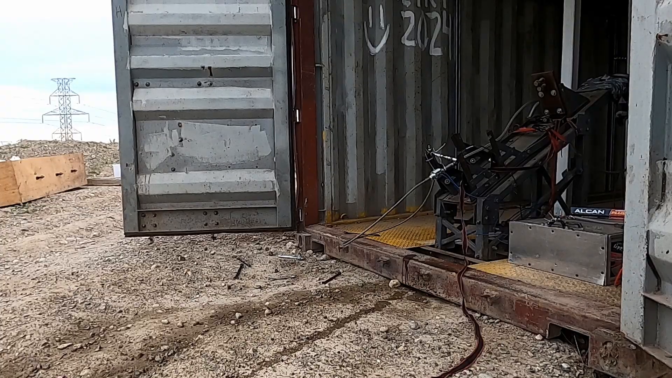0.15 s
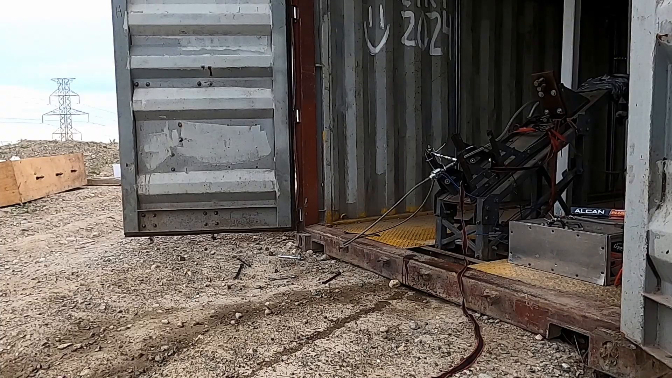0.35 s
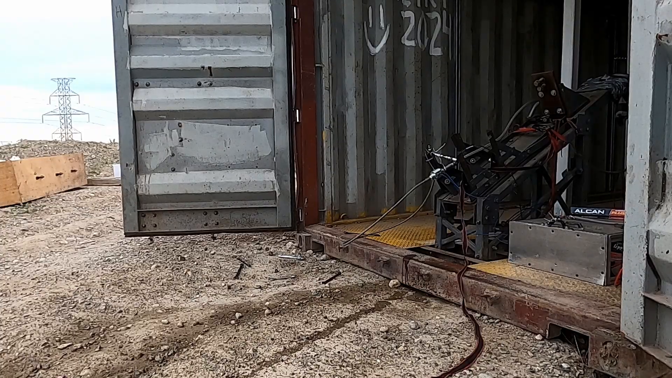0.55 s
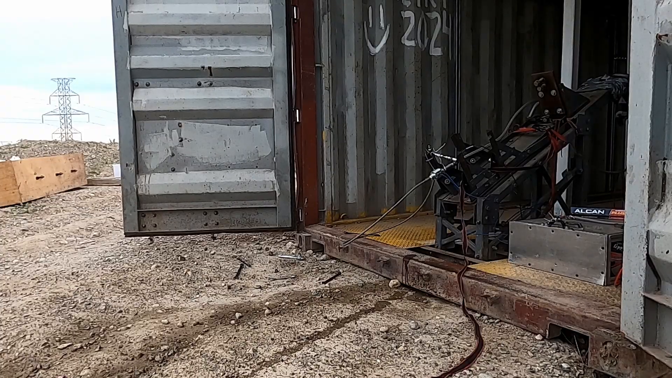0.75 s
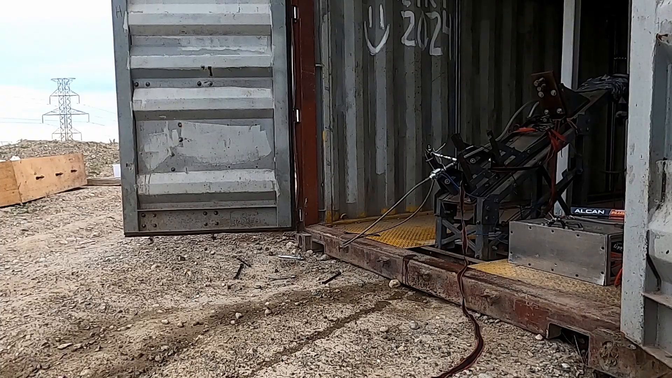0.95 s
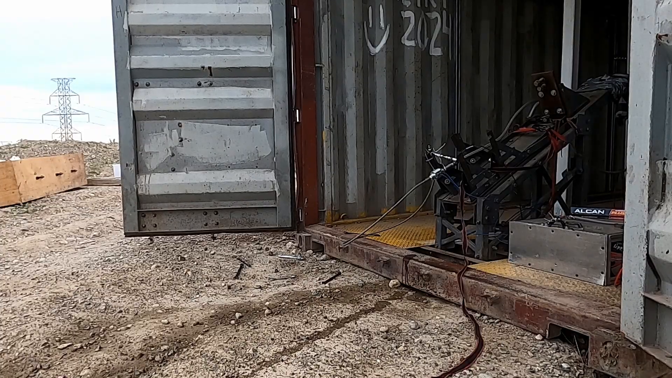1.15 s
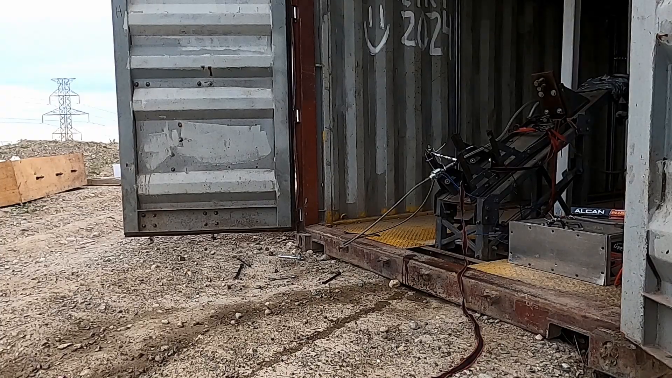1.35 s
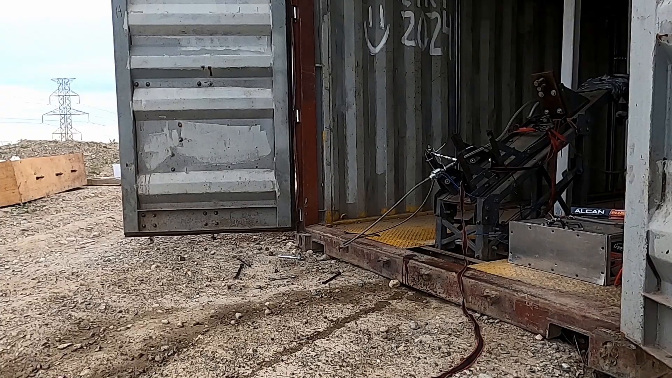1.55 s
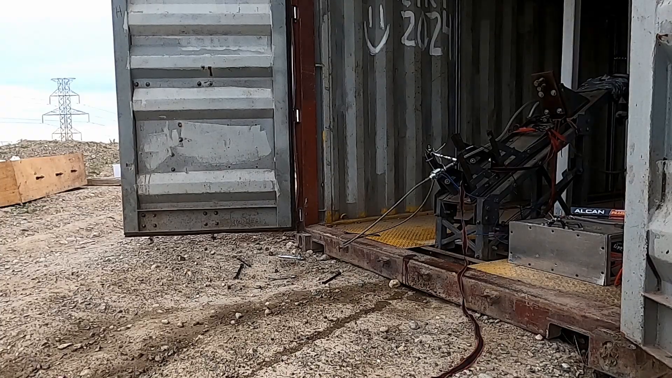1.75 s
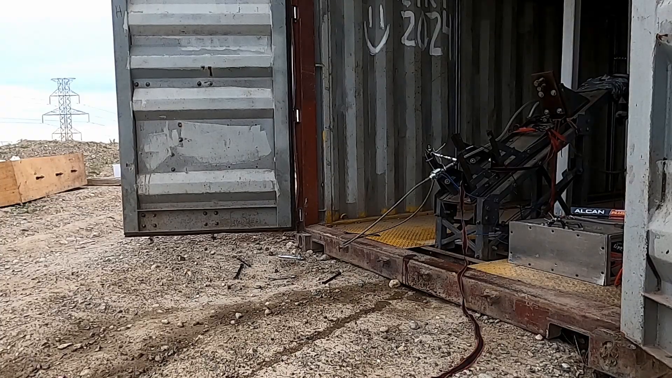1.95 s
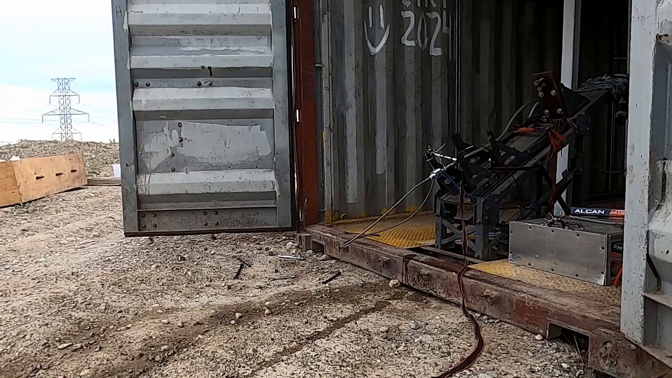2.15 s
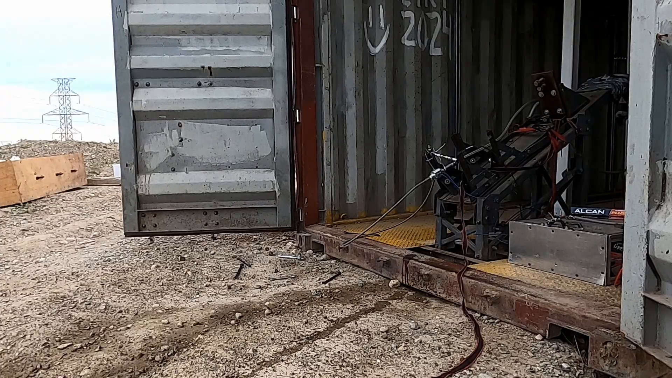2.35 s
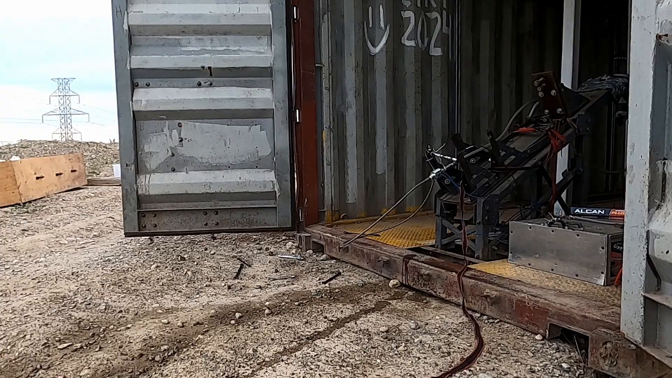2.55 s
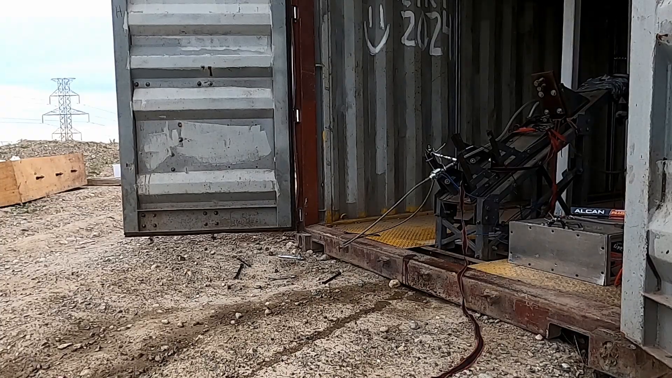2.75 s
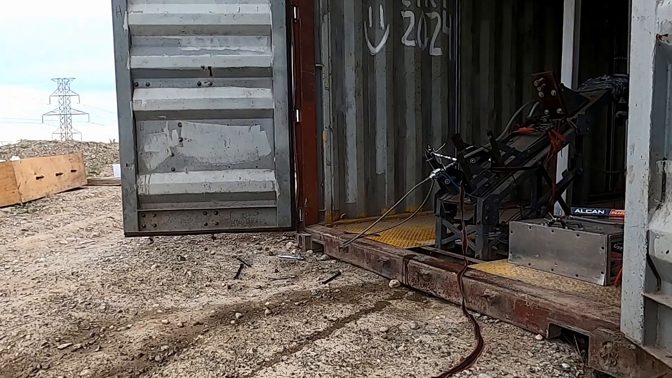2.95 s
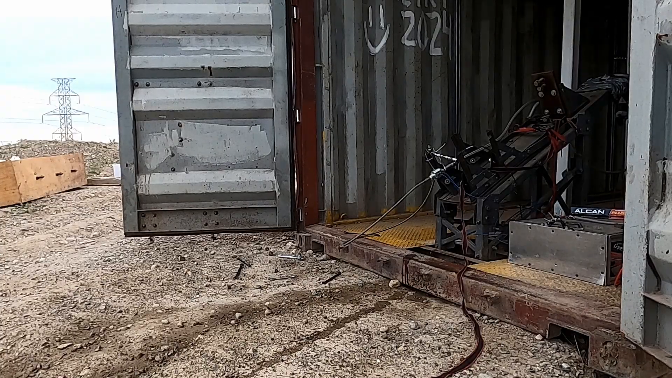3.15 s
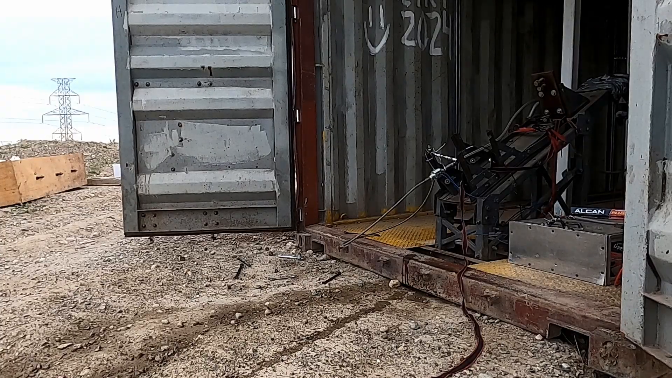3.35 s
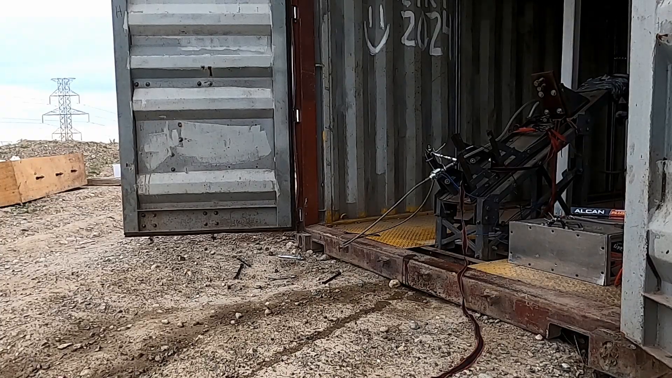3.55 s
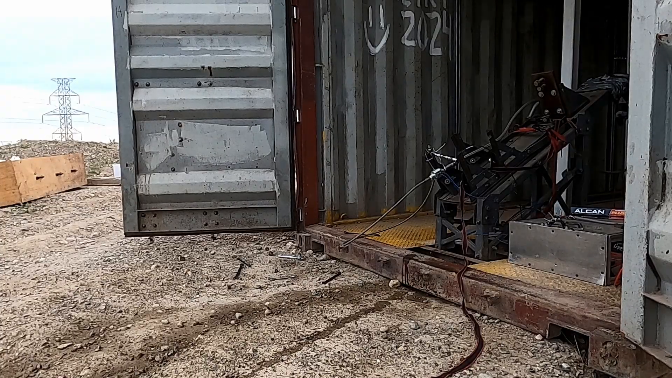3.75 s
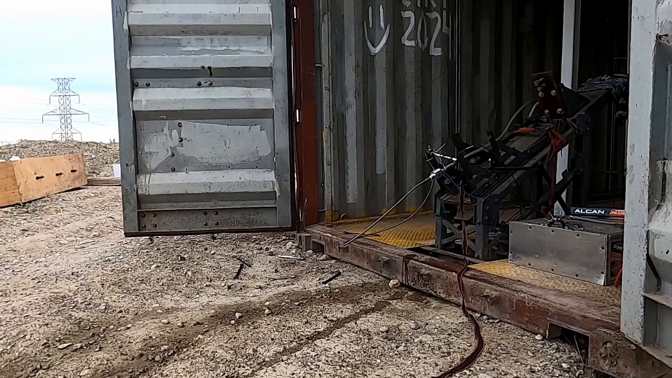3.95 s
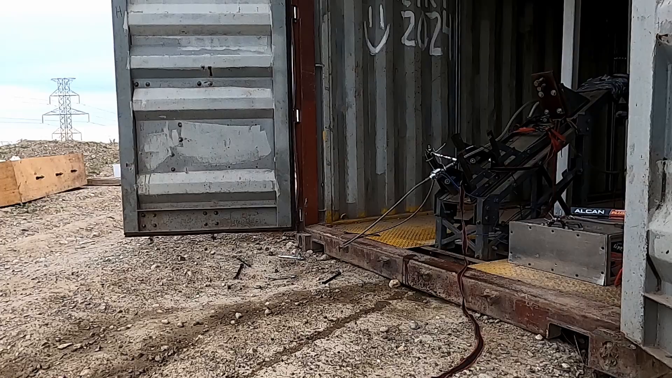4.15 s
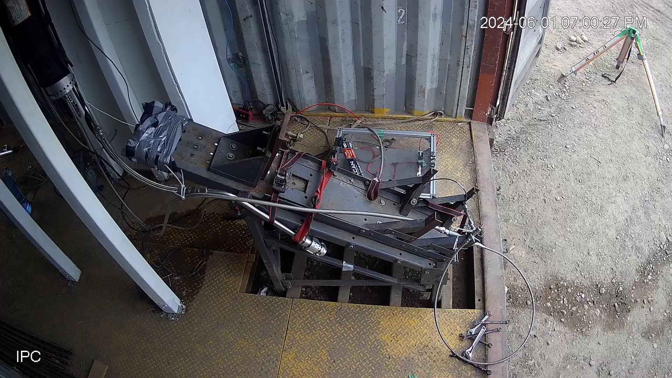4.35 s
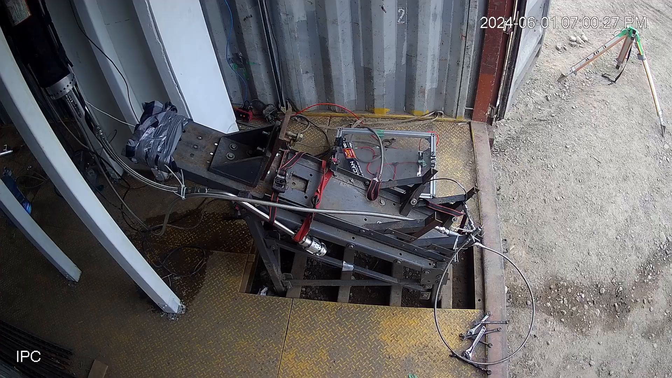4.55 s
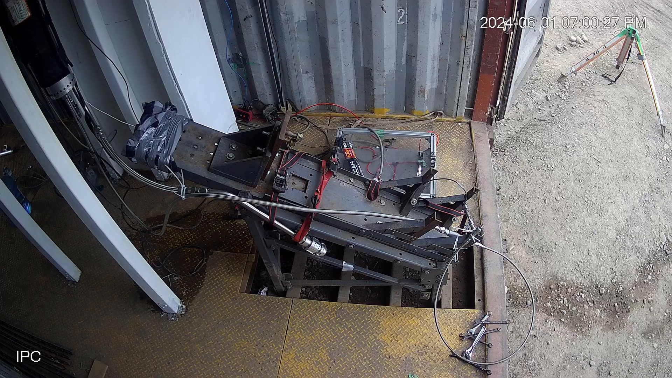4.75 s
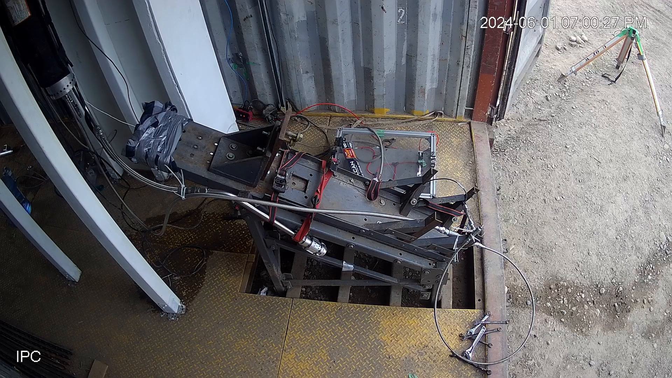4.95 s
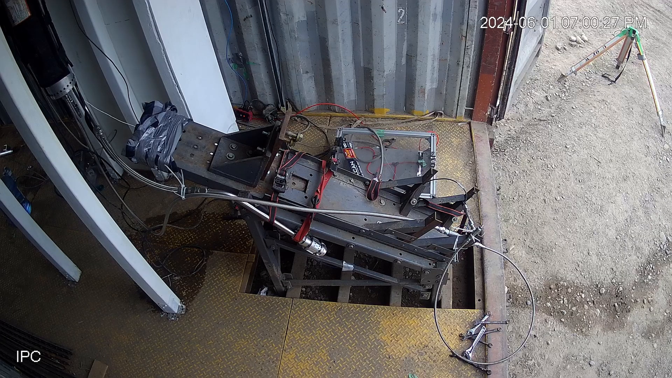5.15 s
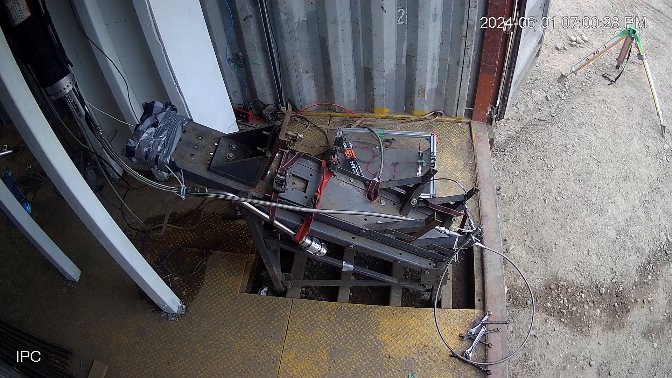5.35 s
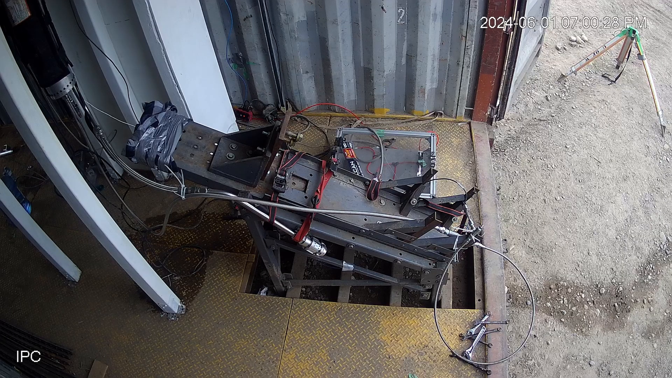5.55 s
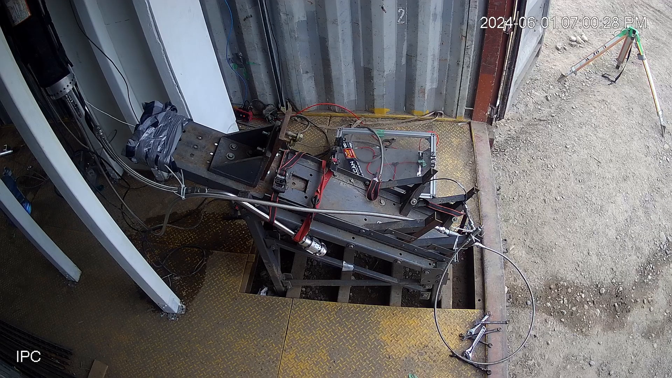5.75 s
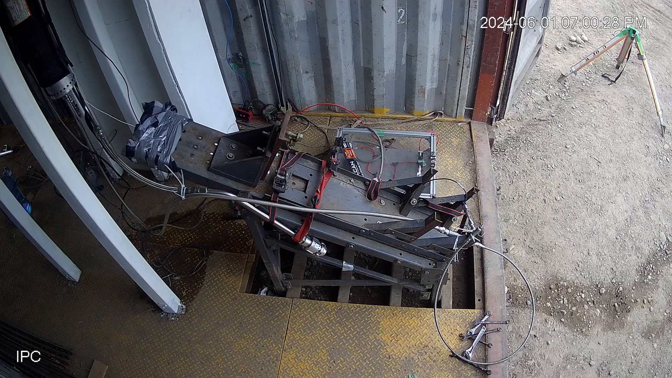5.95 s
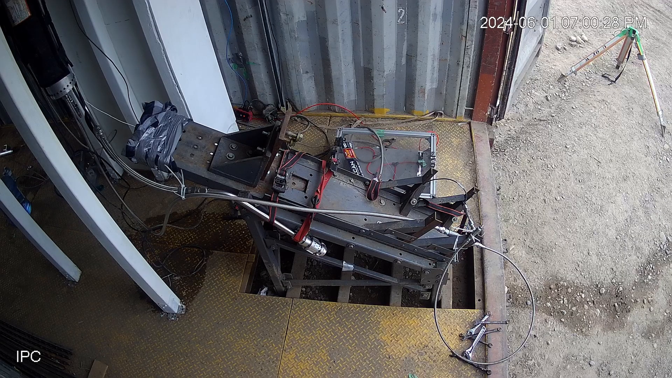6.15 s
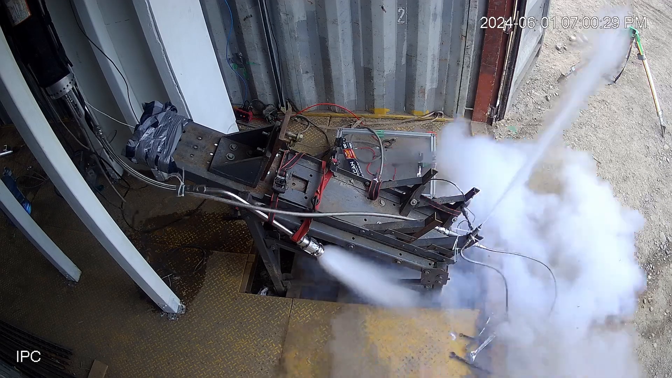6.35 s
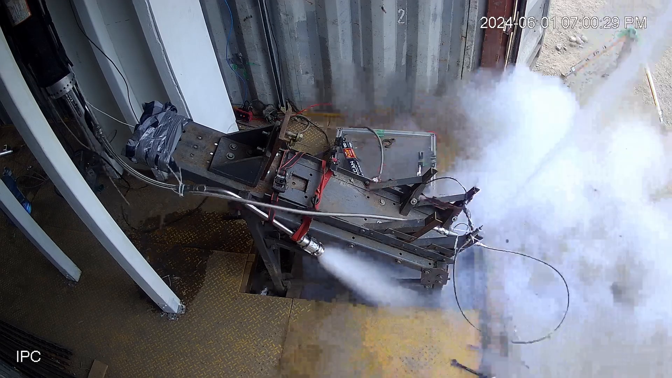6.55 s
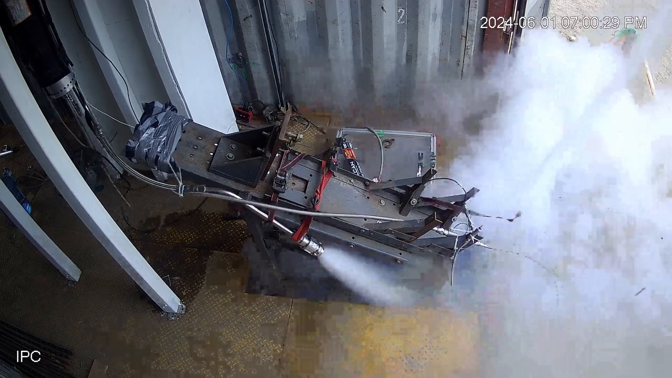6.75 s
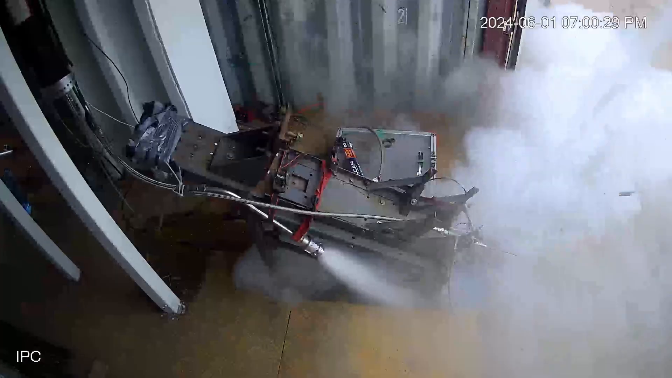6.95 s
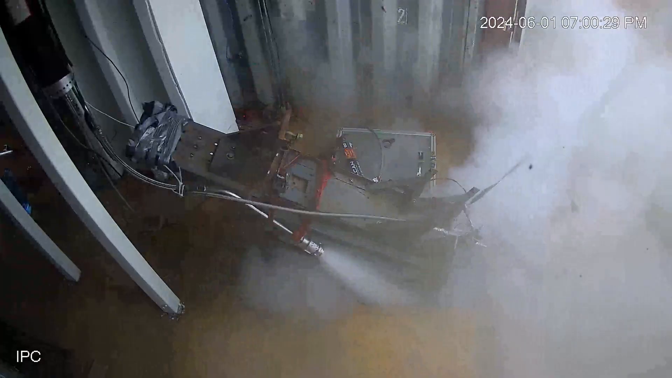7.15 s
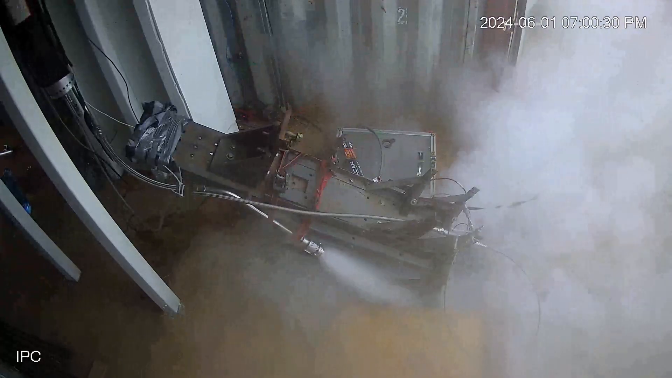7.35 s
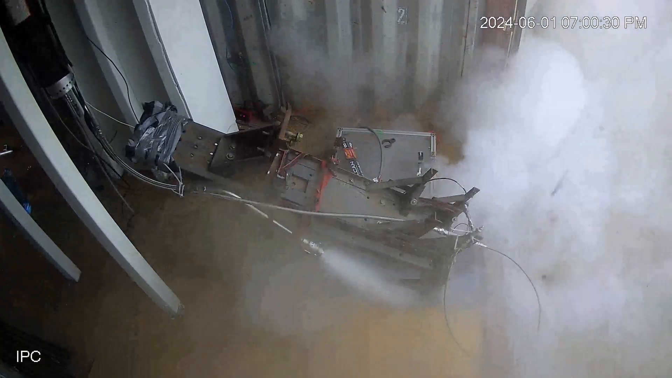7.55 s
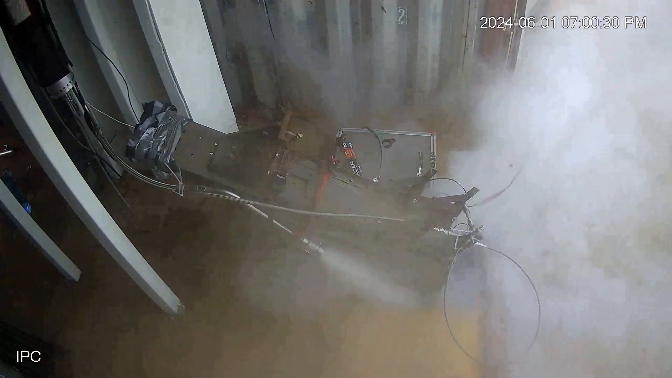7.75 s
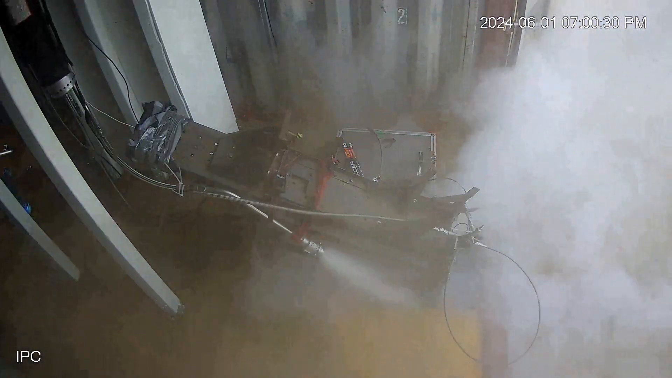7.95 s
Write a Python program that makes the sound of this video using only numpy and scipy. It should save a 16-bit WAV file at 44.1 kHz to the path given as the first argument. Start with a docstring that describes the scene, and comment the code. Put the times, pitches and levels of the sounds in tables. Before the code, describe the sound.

A gas vent hisses continuously, bright and wide in stereo, above soft rumble and hum outside an open container. After a tiny dip at an abrupt cut, the perspective is close and central inside the steel box, duller and lower in level, with a faint high tone. Suddenly the main valve bangs, pipe and walls ring briefly, and a heavy gusting jet roar takes over, its hiss slowly sinking.

```python
"""A steel container with an engine test stand inside, on gravel. A stereo pair out on the gravel hears
a pressure vent hiss over rumble and hum; a hard cut leads to one microphone inside, with a faint whine.
There the main valve slams open: decaying tones ring box and pipe, and the propellant jet roars.
Vent and jet are coloured, gusting noise with resonances; hum and whine are wavering sines."""
import sys
import numpy as np
from scipy import signal
from scipy.fft import rfft, irfft, next_fast_len
from scipy.io import wavfile

SR = 44100
rng = np.random.default_rng(int(sys.argv[2]) if len(sys.argv) > 2 else 0)


def persist_wave(psi):
    """Save psi, clipped to +-1, as 16-bit WAV."""
    counts = np.round(np.clip(psi, -1, 1) * 32767).astype(np.int16)
    wavfile.write(sys.argv[1], SR, np.atleast_2d(counts).T)


N = 353682
SIZE = next_fast_len(N)
GRID_HZ = np.arange(SIZE // 2 + 1) * SR / SIZE + 1e-3  # kept above zero for logs and ratios

# On the gravel. Relative spectrum of the vent's hiss: frequency_hz [Hz], density_db [dB per Hz]
GRAVEL_HISS = [(500, -49), (1200, -20.5), (2000, -11.5), (2900, -7), (3800, -3), (4700, -4.5), (5700, -5.5),
               (6500, -7.5), (7200, -9), (8500, -11.5), (10000, -14), (12500, -17.5), (14000, -23),
               (17000, -29)]
# Relative spectrum of the rumble below it: frequency_hz [Hz], density_db [dB per Hz]
GRAVEL_RUMBLE = [(15, -30), (30, -9), (75, -3), (210, -5), (400, -1), (550, -4.5), (900, -9), (1400, -11.5),
                 (2200, -15.5), (4000, -31)]
# Resonances and notches of box and ground: centre_hz [Hz], width_hz [Hz], bell_db [dB]
GRAVEL_RINGS = [(204, 79, 7.5), (333, 47, -1.7), (398, 43, 2.8), (484, 204, -3.8), (592, 21, -1.7),
                (732, 37, 3.0), (785, 107, -3.0), (1012, 45, 3.2), (1098, 55, -2.4), (1173, 18, -1.9),
                (1205, 34, 3.2), (1302, 57, 2.1), (1744, 90, -2.7), (2088, 61, -2.1), (2820, 143, -2.4),
                (3046, 74, 1.9), (3369, 56, 3.0), (3542, 80, 2.5), (3800, 105, 3.5), (3951, 50, 2.3),
                (4166, 83, 1.8), (4317, 49, 1.6), (4661, 131, -2.3), (4909, 82, 2.3), (5889, 92, 4.1),
                (6826, 158, 2.2), (6976, 66, 2.1), (7719, 139, 2.0), (10788, 84, 3.3), (12403, 83, 2.4)]
# Likeness of the stereo pair's two ports: frequency_hz [Hz], likeness [0-1]
PAIR_LIKENESS = [(60, .94), (290, .97), (1400, .9), (3100, .85), (6800, .72), (9000, .62), (15000, .4)]
# Shadow on the left port: frequency_hz [Hz], left_minus_right_db [dB]
LEFT_SHADOW = [(200, 0), (1300, -2.5), (2400, 0.5), (6000, 0), (8100, -2), (11000, -6.5), (15000, -9)]
# Phase of left against right, differing by frequency, which spreads the hiss across the stereo:
# frequency_hz [Hz], phase_rad [radians]
LEFT_PHASE = [(0, 0), (5860, -1.32), (7410, -3), (8610, -1), (9130, -2.5), (11500, -1.6), (12800, -3),
              (14000, -1), (16200, -4)]
# Hum under the hiss: pitch_hz [Hz], level_db [dB], level_waver_db [dB spread], pitch_waver_hz [Hz spread]
GRAVEL_HUM = [(202.8, -45, 1.5, 1.97), (224.5, -48, 0.5, 2.97), (405, -56, -3, 3.97), (726, -58, -1, 3.95),
              (1015, -56.5, 7.5, 4.03)]

# Inside the container. Relative spectrum of the vent: frequency_hz [Hz], density_db [dB per Hz]
BOX_HISS = [(15, -30), (45, -2.5), (115, -9.5), (250, -7.5), (500, -10), (1200, -12.5), (2200, -12.5),
            (3500, -7.5), (5200, -6), (7700, -10), (9000, -7.5), (10300, -12.5), (12500, -18), (15400, -33)]
# Resonances and notches heard in the box: centre_hz [Hz], width_hz [Hz], bell_db [dB]
BOX_RINGS = [(204, 49, 6.9), (333, 26, 6.2), (376, 63, -4.4), (452, 42, 2.3), (506, 16, -3.7),
             (570, 62, -4.3), (656, 37, 6.7), (796, 32, -3.5), (1076, 59, -3.6), (1141, 31, 4.5),
             (1173, 105, -2.9), (1324, 26, 2.7), (1647, 96, 3.8), (2207, 174, -4.9), (3100, 791, 2.7),
             (4026, 75, 2.5), (4220, 178, -6.7), (4694, 59, 3.3), (4963, 180, 3.9), (5211, 81, 2.7),
             (7278, 278, 2.8), (8527, 302, 3.2), (9216, 63, 3.0), (9366, 64, 2.9), (9571, 379, 3.2),
             (10454, 140, 3.0), (10809, 139, 6.4), (11380, 525, -5.0), (12446, 284, 3.7), (13189, 103, 3.4)]
# Hum in the box: pitch_hz [Hz], level_db [dB], level_waver_db [dB spread], pitch_waver_hz [Hz spread]
BOX_HUM = [(205, -53.5, 1.5, 2), (331, -53.5, 1.5, 2), (659.5, -55, 1.2, 2.5)]
# Path of the faint whine: time_s [s], pitch_hz [Hz]
WHINE_PATH = [(4.37, 1125), (4.8, 1155), (5.05, 1125), (5.3, 1095), (5.48, 1138), (5.8, 1128), (6.24, 1142)]
# Relative spectrum of the jet: frequency_hz [Hz], density_db [dB per Hz]
JET_SPECTRUM = [(12, -56), (20, -30.5), (155, -2), (270, -8), (328, -7), (525, -11), (587, -13.5),
                (1140, -18), (1550, -15), (2100, -23), (3010, -15), (4310, -19), (9110, -27.5),
                (11100, -40.5), (15000, -53)]
# Resonances and notches of the jet in the box: centre_hz [Hz], width_hz [Hz], bell_db [dB]
JET_RESONANCES = [(95, 14, 3), (166, 28, 3.5), (219.6, 14.5, 8), (320.4, 38, 6.5), (595, 25, 6),
                  (702, 37, 1.5), (803, 27, 0), (1100, 35, 0), (1270, 38, 5), (1530, 400, -0.5),
                  (2130, 560, -1), (3030, 1100, 1), (4270, 590, -7.5), (5130, 680, 1), (9400, 610, 5),
                  (12435, 350, 2)]
# Jet parts, in order roar, rush, hiss: level_db [dB], valve_lag_s [s], rise_db_per_s [dB/s],
# surge_db [dB], surge_settle_s [s], gust_db [dB spread], gust_rate_hz [Hz]
JET_LAYERS = [(-15.5, 0.0042, 2600, 3, 0.49, 1.04, 2.6), (-21, 0.0047, 1300, 3.5, 0.091, 0.5, 2.2),
              (-21.5, 0.0005, 1500, 5, 0.019, 1.15, 7.8)]
# Modes of box and pipe rung by the pressure step:
# start_s [s], pitch_hz [Hz], level_db [dB, before swell and decay], t60_s [s to fall 60 dB]
SLAM_MODES = [(6.247, 46, -7, 0.16), (6.2502, 3350, -6, 0.037), (6.2497, 2950, -11, 0.025),
              (6.251, 3750, -11, 0.025)]

# vent and rumble from the gravel
HISS_DB, HISS_FALL_DB_PER_S = -21.5, 0.05
RUMBLE_DB, RUMBLE_FALL_DB_PER_S = -34, 0.5
# the hiss gathers into its strongest band
CORE_HZ, CORE_WIDTH_HZ, CORE_START_DB, CORE_RISE_DB_PER_S = 3800, 570, -1, 0.95
# the treble starts dull and clears
TREBLE_HZ, TREBLE_DULL_DB, TREBLE_CLEARS_S = 8000, -6, 0.8
ECHOES_START_HZ = 1800

# hard cut between the microphones
CUT_OUT_S, CUT_IN_S, GAP_DB = 4.356, 4.36, -19

# inside: the vent's hiss drops in level as the jet bursts in
VALVE_S = 6.254
INSIDE_DB, INSIDE_DROP_DB, DROP_S = -30.5, 8.5, 0.046
WHINE_DB = -56
ROAR_TOP_HZ, JET_HISS_START_HZ = 600, 2200
JET_HISS_SAG_DB_PER_S = 1.1  # the jet's hiss sinks as the cloud thickens

# top of each path
INSIDE_CUTOFF_HZ, CUTOFF_HZ = 15050, 15700


def from_db(db):
    """Amplitude ratio for a level in dB."""
    return 10 ** (np.asarray(db) / 20)


def rms_one(x):
    """Scale to unit RMS."""
    return x / np.sqrt(np.mean(x ** 2) + 1e-20)


def in_time(rows):
    """Straight lines through rows of time in s and values, one track per value column."""
    time_s, *columns = np.transpose(rows)
    return [np.interp(np.arange(N) / SR, time_s, column) for column in columns]


def at_hz(points, hz):
    """Read a curve at the given frequencies, straight over log frequency."""
    table_hz, values = np.array(points).T
    return np.interp(np.log(hz), np.log(table_hz), values)


def drift(rate_hz):
    """Slow chance of spread 1: noise at every 40th sample through two one-pole low-passes."""
    pole = np.exp(-80 * np.pi * rate_hz / SR)
    noise = rng.standard_normal(N // 40 + 2002)
    slow = signal.lfilter([1], [1, -2 * pole, pole * pole], noise)[2000:]  # settled part
    return np.interp(np.arange(N) / 40, np.arange(len(slow)), rms_one(slow))


def turbulence(gust_db, own_db, rate_hz):
    """Spectrum of white noise in six broad bands that gust together and each flicker on their own."""
    spectrum = rfft(rng.standard_normal(SIZE))
    place = np.clip(np.log2(GRID_HZ / 90) / 1.5, 0, 5)  # bands 1.5 octaves apart
    together = gust_db * drift(rate_hz)
    out = np.zeros(N)
    for k in range(6):
        share = np.cos(np.pi / 2 * np.clip(place - k, -1, 1)) ** 2
        band = irfft(spectrum * share, SIZE)[:N]
        out += band * from_db(together + own_db * drift(2 * rate_hz))
    return rfft(out, SIZE)


def colour(points, rings):
    """Smooth spectrum with a bell for every resonance or notch."""
    bells = sum(db / (1 + (2 * (GRID_HZ - hz) / width_hz) ** 2) for hz, width_hz, db in rings)
    return from_db(at_hz(points, GRID_HZ) + bells)


def echoes(t60_s, level_db):
    """A still source in a steel box: dense fixed echoes off the ribbed walls comb the treble finely."""
    t = np.arange(SR // 2) / SR
    decaying = rng.standard_normal(len(t)) * from_db(-60 * t / t60_s)
    tail = rms_one(decaying) / np.sqrt(len(t))
    tail[0] = 0
    share = from_db(level_db) / np.sqrt(1 + (ECHOES_START_HZ / GRID_HZ) ** 2)
    return (1 + share * rfft(tail, SIZE)) / np.sqrt(1 + share ** 2)


def vent_outside():
    """Two ports on the gravel share a common part and differ in a part of their own, level and phase."""
    t = np.arange(N) / SR
    alike = np.clip(at_hz(PAIR_LIKENESS, GRID_HZ), 0, 1)
    common = turbulence(gust_db=0.0, own_db=.5, rate_hz=7.9)
    apart = turbulence(gust_db=.3, own_db=.6, rate_hz=8.3)
    common = np.sqrt(1 + alike) * common * echoes(t60_s=.15, level_db=-7.5)
    apart = np.sqrt(1 - alike) * apart

    # half the shadow goes to each side
    shadow = from_db(at_hz(LEFT_SHADOW, GRID_HZ) / 2)
    phase_turn = np.exp(1j * np.interp(GRID_HZ, *np.transpose(LEFT_PHASE)))
    pair = np.array([(common + apart) * shadow * phase_turn, (common - apart) / shadow])

    spectrum = pair * colour(GRAVEL_HISS, GRAVEL_RINGS)
    core = 1 / (1 + (2 * (GRID_HZ - CORE_HZ) / CORE_WIDTH_HZ) ** 2)
    treble = 1 / (1 + (TREBLE_HZ / GRID_HZ) ** 6)
    shares = [(1 - core - treble, 0),
              (core, CORE_START_DB + CORE_RISE_DB_PER_S * t),
              (treble, TREBLE_DULL_DB * np.exp(-t / TREBLE_CLEARS_S))]
    hiss = sum(from_db(db) * irfft(spectrum * share, SIZE)[:, :N] for share, db in shares)
    hiss = hiss / np.std(irfft(spectrum, SIZE))
    rumble = rms_one(irfft(pair * colour(GRAVEL_RUMBLE, GRAVEL_RINGS), SIZE)[:, :N])

    hiss = hiss * from_db(HISS_DB - HISS_FALL_DB_PER_S * t)
    rumble = rumble * from_db(RUMBLE_DB - RUMBLE_FALL_DB_PER_S * t)
    return hiss + rumble


def tone(pitch_hz, level_db):
    """A sine of moving pitch and level; the level is RMS."""
    return np.sqrt(2) * from_db(level_db) * np.sin(2 * np.pi * np.cumsum(pitch_hz) / SR)


def hum(lines):
    """Tones whose strength and pitch waver a few times a second."""
    out = 0
    for pitch_hz, level_db, level_waver_db, pitch_waver_hz in lines:
        pitch = pitch_hz + pitch_waver_hz * drift(2.91)
        out = out + tone(pitch, level_db + level_waver_db * drift(2.3))
    return out


def vent_inside():
    """The same leak, close and combed by the walls; its level drops as the jet bursts in."""
    noise = turbulence(gust_db=.2, own_db=.5, rate_hz=6) * echoes(t60_s=.2, level_db=-7.5)
    level_db, = in_time([(VALVE_S, INSIDE_DB), (VALVE_S + DROP_S, INSIDE_DB - INSIDE_DROP_DB)])
    return from_db(level_db) * rms_one(irfft(noise * colour(BOX_HISS, BOX_RINGS), SIZE)[:N])


def whine():
    """A thin tone that rises, sags and recovers in pitch, wavering in pitch and level."""
    pitch_hz, = in_time(WHINE_PATH)
    return tone(pitch_hz + 3 * drift(4.6), WHINE_DB + 1.5 * drift(5.0))


def jet():
    """Large eddies roar, middle ones rush, nozzle shear hisses; each shoots up, surges, settles, gusts."""
    noise = turbulence(gust_db=0.52, own_db=0.5, rate_hz=17.0)
    noise = noise * colour(JET_SPECTRUM, JET_RESONANCES)
    roar = 1 / (1 + (GRID_HZ / ROAR_TOP_HZ) ** 6)
    hiss = 1 / (1 + (JET_HISS_START_HZ / GRID_HZ) ** 6)
    shares = (roar, 1 - roar - hiss, hiss)
    sags = (0, 0, JET_HISS_SAG_DB_PER_S)
    out = 0
    for share, sag, layer in zip(shares, sags, JET_LAYERS):
        db, lag_s, rise, surge_db, settle_s, gust_db, rate_hz = layer
        t = np.arange(N) / SR - VALVE_S - lag_s
        after = np.maximum(t, 0)
        level_db = db + rise * np.minimum(t, 0)
        level_db = level_db + surge_db * np.exp(-after / settle_s) - sag * after
        level_db = level_db + gust_db * drift(rate_hz)
        out = out + from_db(level_db) * rms_one(irfft(noise * share, SIZE)[:N])
    return out


def slam():
    """Each mode swells for half a cycle or 3 ms, whichever is longer, under a steady decay in dB."""
    out = 0
    for start_s, pitch_hz, level_db, t60_s in SLAM_MODES:
        t = np.arange(N) / SR - start_s
        decay = from_db(level_db - 60 * np.maximum(t, 0) / t60_s)
        swell = np.clip(t / max(.003, .5 / pitch_hz), 0, 1)
        out = out + decay * swell * np.sin(2 * np.pi * pitch_hz * t)
    return out


def scene():
    """The cut from gravel to container leaves a few milliseconds of much lower level."""
    outside, = in_time([(CUT_OUT_S, 1), (CUT_OUT_S + .0005, from_db(GAP_DB)),
                        (CUT_IN_S, from_db(GAP_DB)), (CUT_IN_S + .001, 0)])
    inside, = in_time([(CUT_IN_S, 0), (CUT_IN_S + 0.00051, 1)])
    far = vent_outside() + hum(GRAVEL_HUM)
    near = vent_inside() + hum(BOX_HUM) + whine() + jet() + slam()
    # the inside microphone's top drops by about 15 dB
    top_cut = signal.ellip(4, .5, 15, INSIDE_CUTOFF_HZ, fs=SR, output="sos")
    return outside * far + inside * signal.sosfilt(top_cut, near)


def record(dry):
    """Peaks are rounded, then the top is cut steeply."""
    rounded = 1.5 * np.tanh(dry / 1.5)
    top_cut = signal.ellip(12, .2, 90, CUTOFF_HZ, fs=SR, output="sos")
    return signal.sosfilt(top_cut, rounded)


dry = scene()
out = record(dry)
persist_wave(out)
```